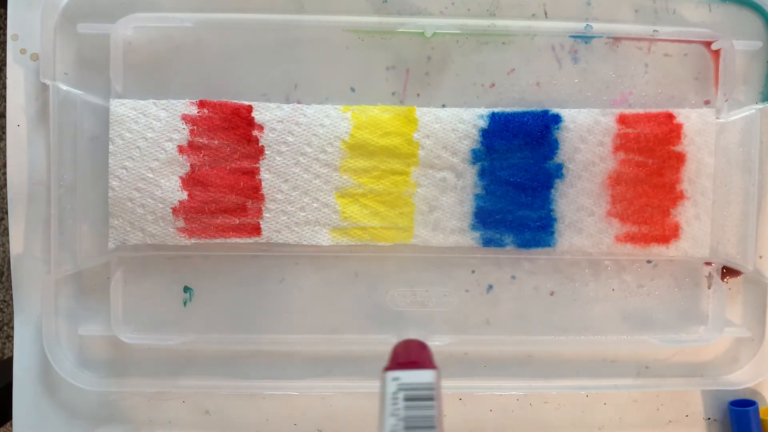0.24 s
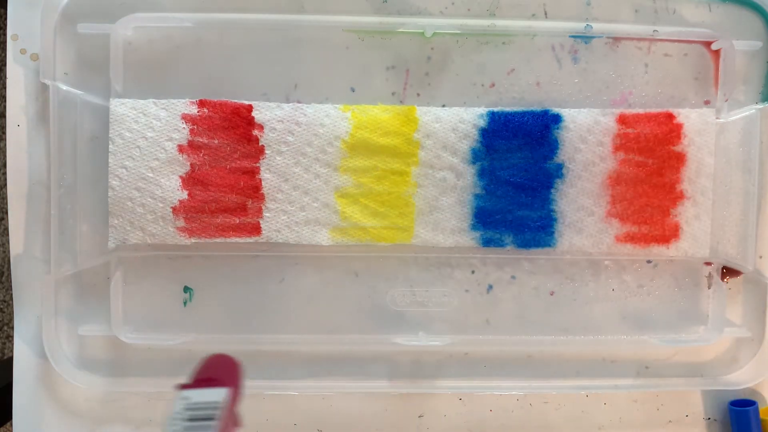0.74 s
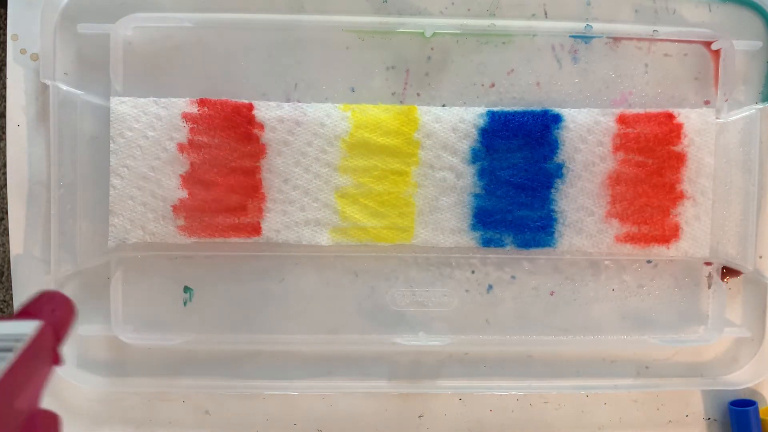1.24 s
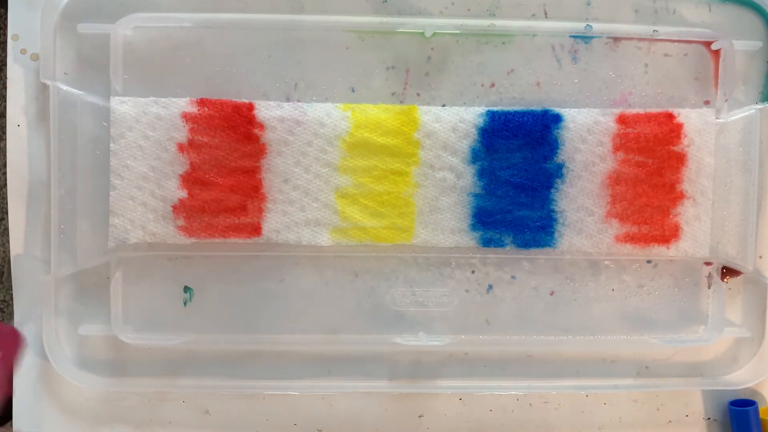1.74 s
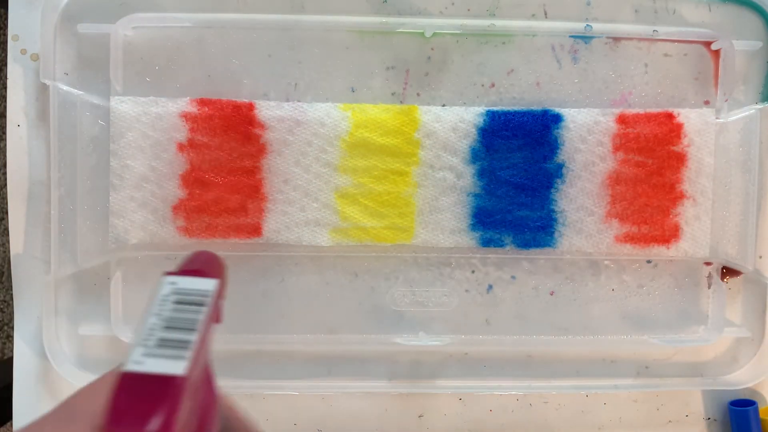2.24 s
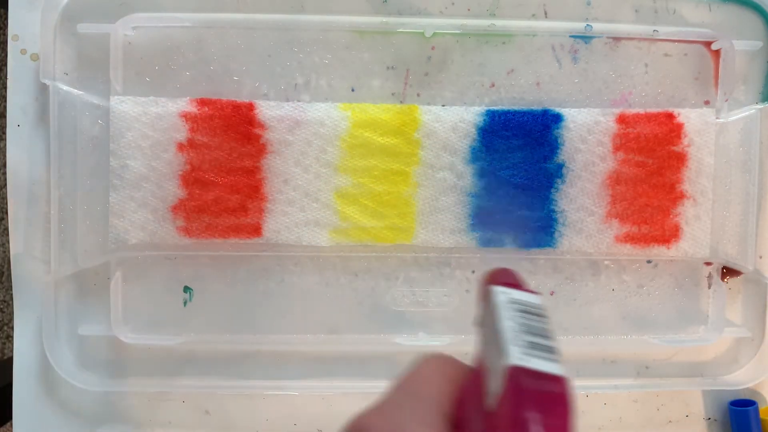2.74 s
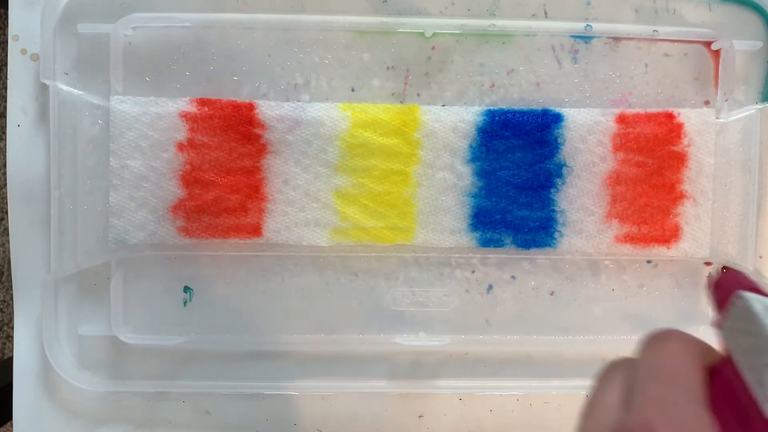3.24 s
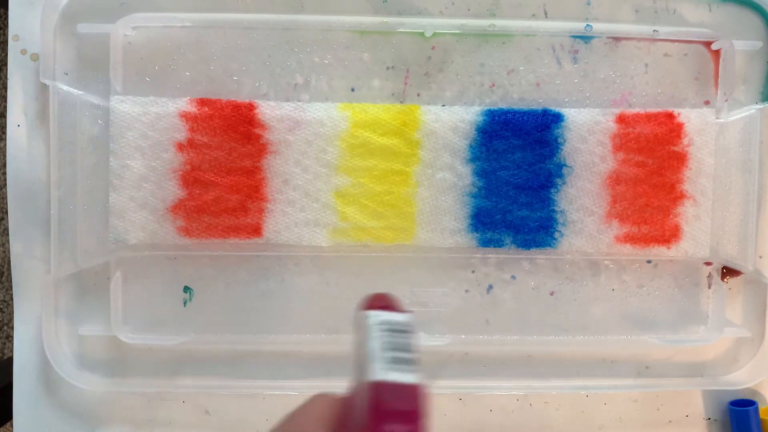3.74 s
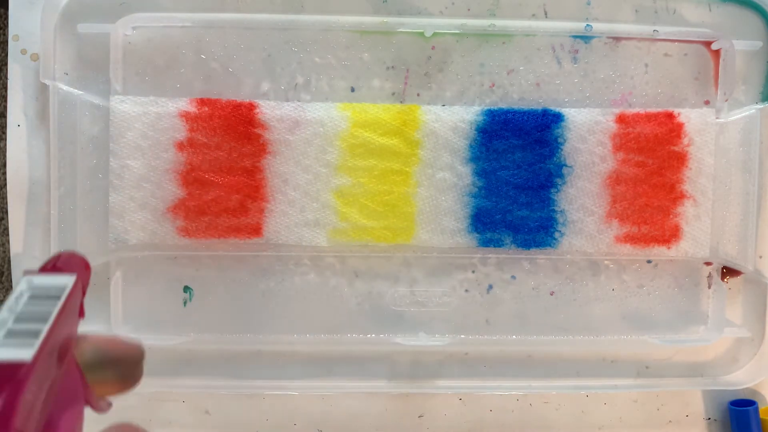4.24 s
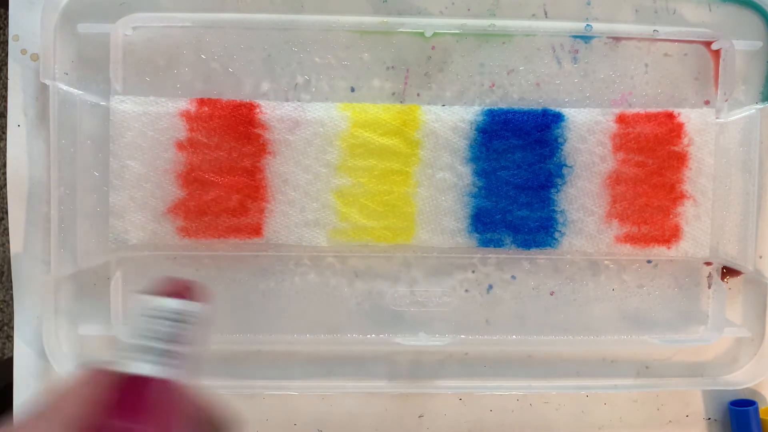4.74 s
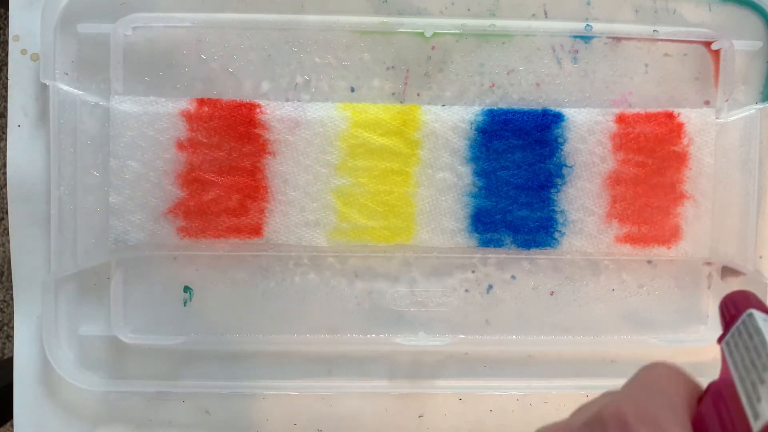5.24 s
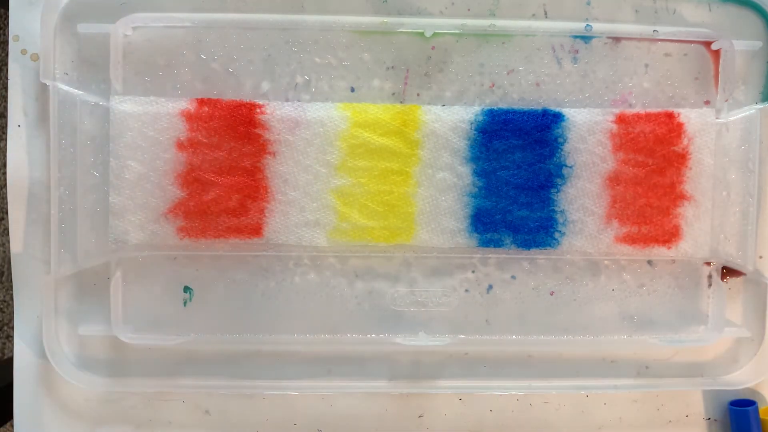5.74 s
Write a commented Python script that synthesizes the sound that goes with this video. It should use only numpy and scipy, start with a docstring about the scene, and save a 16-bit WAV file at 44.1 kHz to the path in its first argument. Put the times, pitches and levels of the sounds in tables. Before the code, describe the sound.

Close up in a quiet room, a hand pumps a plastic spray bottle nine times in a fast, even rhythm. Each stroke ticks, hisses brightly, patters on paper towel in a plastic tray, and clacks back. After a short pause with light finger taps come four less regular squirts, then the bottle is knocked down onto a surface.

```python
"""Over a quiet room's murmur, a hand pumps a plastic trigger sprayer: nine quick strokes, a pause, four looser ones.
In each stroke the trigger ticks (noise snaps, decaying sines), the nozzle hisses (shaped noise), droplets patter
on paper towel and a plastic tray (random clicks in noise), the piston thumps the bottle (sagging low sines) and
the lever springs back with a rattle. Between strokes the hand rustles and taps; last, the bottle is set down
(struck modes). Two microphone ports a few centimetres apart hear it from one end."""
import sys
import numpy as np
from scipy import signal
from scipy.fft import rfft, irfft, next_fast_len
from scipy.io import wavfile

SR = 44100
rng = np.random.default_rng(int(sys.argv[2]) if len(sys.argv) > 2 else 0)


def master_out(mix):
    """Clip the mix to full scale and print it as 16-bit PCM to the path in sys.argv[1]."""
    frames = np.transpose(np.atleast_2d(mix))
    ceiling = np.clip(frames, -1, 1)
    pcm = np.round(ceiling * 32767).astype(np.int16)
    wavfile.write(sys.argv[1], SR, pcm)


N = 263806
FAST = next_fast_len(N)   # FFT length


def amp(db):
    """dB to gain."""
    return 10 ** (np.asarray(db) / 20)


def rms_one(x):
    """Scale to rms 1."""
    return x / np.sqrt(np.mean(x ** 2) + 1e-20)


def at_hz(points, size):
    """Read a table over log frequency on the FFT grid."""
    hz, value = np.transpose(points)
    grid_hz = np.arange(size // 2 + 1) * SR / size
    return np.interp(np.log(grid_hz + 1), np.log(hz), value)


def colour(x, spectrum):
    """Filter a signal by a dB curve over frequency."""
    return irfft(rfft(x, FAST) * amp(at_hz(spectrum, FAST)), FAST)[..., :N]


def coloured_noise(spectrum):
    """Steady noise of the given colour, rms 1."""
    return rms_one(colour(rng.standard_normal(N), spectrum))


def drift(hz):
    """Slow random wander: noise through a two-pole low-pass, rms 1."""
    r = np.exp(-2 * np.pi * hz / SR)
    warm_up = 9000
    noise = rng.standard_normal(N + warm_up)
    return rms_one(signal.lfilter([1], [1, -2 * r, r * r], noise)[warm_up:])


def clicks(times, gains):
    """One sample for each event, over a floor far too low to hear."""
    out = np.full(N, 1e-18)
    np.add.at(out, (np.asarray(times) * SR).astype(int), gains)
    return out


def dying(x, t60):
    """Each click becomes an envelope that falls 60 dB in t60 seconds."""
    return signal.lfilter([1], [1, -amp(-60 / (t60 * SR))], x)


def ring(x, hz, t60):
    """A resonator: a unit click sets off a decaying sine that starts near height 1."""
    r, w = amp(-60 / (t60 * SR)), 2 * np.pi * hz / SR
    return signal.lfilter([0, np.sin(w)], [1, -2 * r * np.cos(w), r * r], x)


def struck(times, level_db, modes):
    """Every blow strikes each mode with a random strength of its own."""
    chance_db = rng.normal(0, 2.5, (len(times), len(modes)))
    out = 0
    for k, (hz, db, t60) in enumerate(modes):
        blows = clicks(times, amp(level_db + db + chance_db[:, k]))
        out = out + ring(blows, hz, t60)
    return out


def gain_curve(tables, axis):
    """Join dB corners into gain over time; each table fades in over 4 ms and out over 20 ms."""
    t, out = np.arange(N) / SR, np.zeros(N)
    for rows in tables:
        rows = np.array(rows)
        fade_in = np.clip((t - rows[0, 0]) / .004 + 1, 0, 1)
        fade_out = np.clip((rows[-1, 0] - t) / .02 + 1, 0, 1)
        level = amp(np.interp(t, rows[:, 0], rows[:, axis]))
        out = np.maximum(out, fade_in * fade_out * level)
    return out


def grains(per_s, spread_db):
    """Random clicks of uneven size and either sign, rms 1."""
    sizes = amp(spread_db * np.minimum(rng.exponential(1, N), 4)) * rng.choice([-1, 1], N)
    return rms_one(sizes * (rng.random(N) < per_s / SR))


def echoes(t60):
    """A dying noise for each port, unit energy, after a 0.8 ms gap."""
    t = np.arange(int(.4 * SR)) / SR
    tail = rng.standard_normal((2, len(t))) * amp(-60 * t / t60) * (t > .0008)
    return tail / np.sqrt(np.sum(tail ** 2, axis=1, keepdims=True))


# phase lead of the left port over the right: pitch_hz, lead_rad
PORT_LEAD = [(100, 0), (1000, .5), (1800, .3), (3400, 1.5), (4700, 2.9), (5500, 3.4), (6600, 4.8),
             (7900, 6.1), (9300, 6.4), (10500, 7.9), (11600, 9.2), (13500, 9.6), (14100, 11), (14900, 12.4),
             (16000, 12.6)]
# level of the left port over the right: pitch_hz, level_db
PORT_SHADE = [(80, -1), (250, -5), (550, -9.5), (1100, 1), (2400, -1.5), (4000, -6), (6000, 1),
              (16000, -0.5)]
TRAY_T60_S, TRAY_DB = .015, -14   # short echo; level against the direct sound
ROOM_T60_S, ROOM_DB = .3, -21


def ports(x):
    """Left and right differ in phase and level by frequency; tray and room echoes are separate at each port."""
    size = next_fast_len(N + SR // 2)
    half = amp(at_hz(PORT_SHADE, size) / 2) * np.exp(.5j * at_hz(PORT_LEAD, size))
    direct = np.array([half, 1 / half])   # the difference is split evenly between the ports
    tails = rfft(amp(TRAY_DB) * echoes(TRAY_T60_S) + amp(ROOM_DB) * echoes(ROOM_T60_S), size)
    return irfft(rfft(x, size) * (direct + tails * abs(direct)), size)[:, :N]


# share of a wide source that differs between the ports: pitch_hz, level_db
PORT_SCATTER = [(100, -14), (500, 1), (1500, -8), (3000, 0), (4400, -3), (5100, -22), (6300, -4),
                (8600, -20), (10300, -4), (12500, -22), (14200, -3), (15300, -20)]


def wide(grainy, spectrum, gain):
    """A spread-out noise: one part from the source direction, one part with noise of its own at each port."""
    common = rms_one(colour(rng.standard_normal(N) + grainy, spectrum))
    separate = rms_one(colour(rng.standard_normal((2, N)) + grainy, spectrum))
    left, right = colour(separate, PORT_SCATTER)
    return ports(common * gain) + np.array([colour(left, PORT_SHADE), right]) * gain


# colour of the room's murmur: pitch_hz, level_db (per Hz, relative)
MURMUR_COLOUR = [(20, -22.5), (45, -2), (90, 2.5), (150, -2), (220, 6), (400, -13.5), (650, -14),
                 (900, -30.5), (1500, -22.5), (3000, -33.5), (5000, -32), (8000, -31.5), (12000, -35),
                 (15500, -55.5)]
MURMUR_DB = -66.5   # before it wavers


def room_tone():
    """Low murmur of air and distant appliances: coloured noise wavering unevenly."""
    return wide(0, MURMUR_COLOUR, amp(MURMUR_DB + 1.5 * drift(3) + 1.5 * drift(12)))


# the hand shifts on the bottle, one list per shift: time_s, level_db (before the clumping)
HAND_SHIFTS = [
    [(2.93, -71.5), (3.04, -78.5), (3.272, -94.5), (3.4, -96.5)],
    [(4.24, -91), (4.284, -102), (4.45, -96)],
    [(4.78, -74), (4.868, -81), (5.05, -85)],
    [(5.4, -74), (5.542, -75), (5.62, -66.5)],
    [(5.64, -63), (5.708, -64), (5.828, -71), (5.98, -80)],
]
# colour of skin on plastic: pitch_hz, level_db (per Hz, relative)
SKIN_COLOUR = [(300, -3), (600, -6.5), (1300, -3.5), (2500, -13), (3800, -7), (6000, -14.5), (12000, -26.5)]


def rustle():
    """Skin and plastic slide softly: grainy noise, its level wandering into clumps."""
    slips = .5 * grains(1500, 4)
    return wide(slips, SKIN_COLOUR, gain_curve(HAND_SHIFTS, axis=1) * amp(2 * drift(12)))


# fingers tap the bottle wall: start_s, level_db (nominal), t60_s
FINGER_TAPS = [(2.975, -57, 0.04), (3.048, -53.5, 0.041), (3.0889, -65, 0.043), (3.1373, -64, 0.039),
               (3.2301, -67.5, 0.045), (4.916, -62, 0.044), (5.442, -63, 0.04), (5.5079, -49, 0.085),
               (5.8206, -55.5, 0.055)]


def taps():
    """Fingers on the bottle wall: dull little bursts of skin-coloured noise."""
    envelope = sum(dying(clicks([s], amp(db - 4.5)), t60) for s, db, t60 in FINGER_TAPS)
    return envelope * coloured_noise(SKIN_COLOUR)


# bottle set down: start_s, level_db (nominal), tilt_db_per_octave (about 1.2 kHz), crack_db (nominal)
SET_DOWN_KNOCKS = [(5.625, -39, 10.5, -44), (5.644, -48, 7, -80), (5.7, -31.5, -1, -59),
                   (5.72, -46, 0, -69), (5.759, -45, -5.5, -82), (5.766, -48.5, -7, -79)]
# resonances of the bottle set down: pitch_hz, level_db (before tilt and chance), t60_s
BOTTLE_MODES = [(467, -9, 0.098), (572, -9, 0.15), (820, -1, 0.052), (1110, -4.5, 0.072), (1540, 5.5, 0.03),
                (2010, 1, 0.037), (2900, -16, 0.029), (3900, -4.5, .014)]


def knocks():
    """The bottle lands on its rim with a crack, then flat on its base, duller, and rocks: noise and struck modes."""
    start_s, _, _, crack_db = np.transpose(SET_DOWN_KNOCKS)
    hits = clicks(start_s, amp(crack_db + 12.0))
    envelope = dying(hits, 0.018) + amp(-18.5) * dying(hits, 0.17)
    crack = envelope * coloured_noise(PATTER_COLOUR)
    body = 0
    for s, db, tilt_db, _ in SET_DOWN_KNOCKS:
        tilted = [(hz, g + tilt_db * np.log2(hz / 1200), t60) for hz, g, t60 in BOTTLE_MODES]
        body = body + struck([s], db - 7.5, tilted)
    body = signal.lfilter(np.hanning(9) / 4, 1, body)   # the contact lasts a fifth of a millisecond
    return crack + body * (1 + .3 * drift(200))   # the ring is uneven, its level wavering at random


# strokes of the trigger, levels before sputter: squeeze_s, rise_s (to full jet), hold_s, hiss_db (peak),
# sag_db (of the hiss while the jet holds), patter_db (crest), drum_db (tray drumming over the patter)
TRIGGER_STROKES = [(0.039, 0.029, 0.15, -29, 6.5, -37, -12), (0.364, 0.032, 0.14, -30, 3, -36.5, -9),
                   (0.688, 0.04, 0.14, -30.5, 6, -38, -9.5), (1.018, 0.037, 0.13, -30.5, 2, -38, -8),
                   (1.357, 0.036, 0.13, -28, 10, -38.5, -9.5), (1.673, 0.035, 0.12, -29, 3.5, -40, -10.5),
                   (1.992, 0.027, 0.13, -28.5, 3, -37, -8.5), (2.317, 0.037, 0.13, -27, 5.5, -37.5, -10),
                   (2.631, 0.028, 0.14, -27.5, 4.5, -38.5, -13), (3.593, 0.027, 0.12, -26, 10, -37.5, -15),
                   (3.914, 0.028, 0.13, -28, 4.5, -38, -6), (4.492, 0.027, 0.1, -30, 7, -40.5, -21.5),
                   (5.093, 0.022, 0.11, -30, 5, -40, -15.5)]
# the lever springs back after each stroke: let_go_s, valve_delay_s, stop_delay_s (both after let-go);
# nominal levels: let_go_snap_db, let_go_ring_db, valve_snap_db, valve_ring_db, stop_ring_db
LEVER_RETURNS = [(0.237, 0.014, 0.042, -47, -37, -37, -38, -34.5),
                 (0.558, 0.014, 0.037, -37.5, -41, -35, -36, -35.5),
                 (0.892, 0.016, 0.036, -40, -38, -39, -42, -33.5),
                 (1.215, 0.015, 0.04, -47.5, -41, -32.5, -42, -36.5),
                 (1.552, 0.012, 0.037, -39.5, -42.5, -37.5, -48, -30),
                 (1.85, 0.023, 0.048, -37.5, -46, -34, -41, -38),
                 (2.179, 0.016, 0.042, -42, -40, -37.5, -39, -38.5),
                 (2.511, 0.015, 0.043, -35.5, -42.5, -34, -35, -37.5),
                 (2.833, 0.017, 0.042, -42.5, -40, -35.5, -38.5, -38),
                 (3.762, 0.018, 0.046, -60, -54, -34.5, -39, -36),
                 (4.103, 0.016, 0.044, -54.5, -40.5, -33.5, -46, -30.5),
                 (4.652, 0.016, 0.042, -60, -61, -35.5, -37, -41),
                 (5.252, 0.025, 0.048, -53, -49, -34.5, -37, -41)]
LEAD_IN_S, DIE_S = 0.013, 0.049   # a stroke wakes before the squeeze and dies after the lever stops
HISS_WAKE_DB, HISS_SQUEEZE_DB, HISS_STOP_DB, HISS_END_DB = -71.5, -52.5, -71, -82   # faint, around the jet
HISS_HALF_SAG = .3   # share of the sag lost halfway
DRIBBLE_S, DRIBBLE_DB = 0.023, 11   # the jet dribbles this long and loses this much
PATTER_WAKE_DB, PATTER_SQUEEZE_DB = -60, -49.5
PATTER_SHUT_DB, PATTER_STOP_DB, PATTER_END_DB = -57, -55.5, -69.5
PATTER_RISE_DB, PATTER_CREST_S = 1.5, 0.058   # climb from full jet to a crest this long before the shut


def stroke_curves():
    """Gains of hiss, patter and drumming: corners at wake, squeeze, full jet, sag or crest, shut, stop and end."""
    hiss, drops = [], []
    for stroke, (let_go, _, travel, *_) in zip(TRIGGER_STROKES, LEVER_RETURNS):
        squeeze, rise, hold, hiss_db, sag_db, patter_db, drum_db = stroke
        wake, full = squeeze - LEAD_IN_S, squeeze + rise
        shut, stop = full + hold, let_go + travel
        end = stop + DIE_S
        hiss.append([(wake, HISS_WAKE_DB), (squeeze, HISS_SQUEEZE_DB), (full, hiss_db),
                     (full + hold / 2, hiss_db - HISS_HALF_SAG * sag_db), (shut, hiss_db - sag_db),
                     (shut + DRIBBLE_S, hiss_db - sag_db - DRIBBLE_DB),
                     (stop, HISS_STOP_DB), (end, HISS_END_DB)])
        patter = [(wake, PATTER_WAKE_DB), (squeeze, PATTER_SQUEEZE_DB), (full, patter_db - PATTER_RISE_DB),
                  (shut - PATTER_CREST_S, patter_db), (shut, PATTER_SHUT_DB),
                  (stop, PATTER_STOP_DB), (end, PATTER_END_DB)]
        drops.append([(s, db, db + drum_db) for s, db in patter])
    return gain_curve(hiss, axis=1), gain_curve(drops, axis=1), gain_curve(drops, axis=2)


# the head sings under the moving piston: pitch_hz, level_db (relative to the drag), t60_s
PISTON_MODES = [(1222, -26.5, 0.03), (1350, -34, 0.0061), (2050, -39, 0.007)]


def pump():
    """The piston seal drags in its barrel while water flows: grains at the patter's level ring the head."""
    _, flow, _ = stroke_curves()
    drag = flow * amp(2.5 * drift(60)) * grains(3000, 3)
    return sum(amp(db) * ring(drag, hz, t60) for hz, db, t60 in PISTON_MODES)


# the piston thumps the bottle, mostly during the squeeze: start_s, level_db (nominal)
PISTON_THUMPS = [(0.074, -27.5), (0.368, -40.5), (0.396, -28.5), (0.701, -38.5), (0.726, -31), (1.03, -35),
                 (1.327, -46.5), (1.691, -34.5), (2.005, -39), (2.025, -29.5), (2.335, -32), (2.636, -41),
                 (2.661, -30.5), (3.584, -41), (3.844, -46.5), (3.926, -37), (4.492, -39.5), (4.678, -50),
                 (4.743, -47), (5.095, -38.5)]
# nominal pitches, before chance and the sag: listed thumps, slackening piston, landing piston
THUMP_HZ, LET_GO_THUMP_HZ, STOP_THUMP_HZ = 280.2, 244, 272.3
LET_GO_THUMP_DB, STOP_THUMP_DB = -4.5, -40   # first is over the let-go ring
THUMP_LAG_S = 0.0035   # the bottle answers the lever's stop this late
THUMP_SPREAD = 0.05   # share by which the pitch varies


def thump_rows():
    """Listed thumps, then those of the slackening and the landing piston: start_s, level_db, pitch_hz."""
    rows = [(s, db, THUMP_HZ) for s, db in PISTON_THUMPS]
    for let_go, _, _, _, ring_db, *_ in LEVER_RETURNS:
        rows.append((let_go, ring_db + LET_GO_THUMP_DB, LET_GO_THUMP_HZ))
    for let_go, _, travel, *_ in LEVER_RETURNS:
        rows.append((let_go + travel + THUMP_LAG_S, STOP_THUMP_DB, STOP_THUMP_HZ))
    return rows


def thumps():
    """The piston pushes the bottle wall: two or three low cycles that swell and die, sagging in pitch."""
    out, t = np.zeros(N), np.arange(3000) / SR
    shape = (t / 0.0053) ** 2 * np.exp(2 - 2 * t / 0.0043)
    sagging_time = 0.83 * t + 0.0025 * (1 - np.exp(-t / 0.0059))
    for s, db, hz in thump_rows():
        turns = hz * (1 + THUMP_SPREAD * rng.standard_normal()) * sagging_time
        wave = np.sin(2 * np.pi * turns + rng.uniform(0, 2 * np.pi))
        i = int(s * SR)
        out[i:i + 3000] += amp(db + 2.66) * shape * wave
    return out


# ticks as the finger takes up, squeezes and seats the lever: start_s, snap_db, ring_db (both nominal)
LEVER_TICKS = [(0.004, -33.5, -36.5), (0.038, -25.5, -39), (0.053, -31, -31.5), (0.064, -31, -30.5),
               (0.07, -37, -31), (0.329, -39.5, -38), (0.364, -24.5, -39), (0.378, -32, -31.5),
               (0.392, -34.5, -29.5), (0.652, -39, -35.5), (0.689, -25, -38), (0.879, -48, -43),
               (0.705, -24, -34.5), (0.72, -31, -25.5), (1.013, -41, -38.5), (1.308, -46, -54),
               (1.327, -45.5, -41), (1.647, -41.5, -34), (1.67, -30.5, -37), (1.68, -34, -36),
               (1.945, -33, -33.5), (1.955, -42, -36.5), (1.991, -27, -34.5), (2.005, -26.5, -30),
               (2.205, -53.5, -38), (2.315, -32.5, -41.5), (2.325, -31.5, -29), (2.605, -31, -41),
               (2.631, -29, -36.5), (2.643, -27, -36), (3.02, -66, -56), (3.296, -59.5, -69.5),
               (3.567, -36, -32), (3.588, -63, -36.5), (3.82, -46, -41.5), (3.848, -29.5, -32),
               (3.86, -44.5, -41), (3.892, -41.5, -38.5), (3.909, -32, -35), (3.923, -37.5, -28),
               (4.192, -31, -31), (4.2, -43.5, -43.5), (4.309, -58, -59), (4.473, -37.5, -32.5),
               (4.487, -39, -36), (4.715, -60, -58), (4.744, -40, -39.5), (5.068, -39.5, -34),
               (5.089, -58, -32), (5.309, -64, -42), (5.334, -49, -41.5), (5.355, -36, -35),
               (5.556, -66, -50)]
# nominal ring of the head, before the grip shifts it by a random share
TICK_HZ, LET_GO_HZ, VALVE_HZ, STOP_HZ, GRIP_SPREAD = 1323.5, 1200, 1282, 1357, 0.028
STOP_SNAP_DB = -51.5
CHATTER_SNAP_DB, CHATTER_RING_DB, CHATTER_SPREAD_DB = -60, -50.5, 2   # two faint loose ticks about each stop


def tick_rows():
    """Listed ticks, then let-go, valve, stop and chatter, as columns: start_s, snap_db, ring_db, pitch_hz."""
    rows = [(s, snap_db, ring_db, TICK_HZ) for s, snap_db, ring_db in LEVER_TICKS]
    for let_go, delay, travel, go_snap_db, go_ring_db, valve_snap_db, valve_ring_db, stop_db in LEVER_RETURNS:
        stop = let_go + travel
        rows += [(let_go, go_snap_db, go_ring_db, LET_GO_HZ),
                 (let_go + delay, valve_snap_db, valve_ring_db, VALVE_HZ),
                 (stop, STOP_SNAP_DB, stop_db, STOP_HZ)]
        for offset_s in (rng.uniform(-.018, -.008), rng.uniform(.01, .035)):
            chance_db = CHATTER_SPREAD_DB * rng.standard_normal()
            rows.append((stop + offset_s, CHATTER_SNAP_DB + chance_db, CHATTER_RING_DB + chance_db, TICK_HZ))
    s, snap_db, ring_db, ring_hz = np.transpose(rows)
    return s, snap_db, ring_db, ring_hz * (1 + GRIP_SPREAD * rng.standard_normal(len(s)))


# trigger head beside its main ring: pitch_hz, level_db (before chance), t60_s
HEAD_SIDE_MODES = [(599, -9, 0.0064), (1244, -13, 0.11), (2080, -22, 0.0057), (2500, -10, 0.0062)]
# colour of the plastic snap: pitch_hz, level_db (per Hz, relative)
SNAP_COLOUR = [(1500, -9), (3000, -6.5), (5000, 5.5), (7500, 11), (10000, 5), (13000, -3.5), (16000, -15)]
CLACK_DB, CLACK_T60_S = -8.5, 0.017   # dull noisy clack under each ring of the head


def ticks():
    """Plastic on plastic: a bright noise snap; the hollow head swells and rings at a pitch set by the grip."""
    s, snap_db, ring_db, ring_hz = tick_rows()
    hits = clicks(s, amp(snap_db + 5))
    tail = amp(-18) * dying(hits, .055)
    snap = (dying(hits, 0.004) + tail) * coloured_noise(SNAP_COLOUR)
    head, t = np.zeros(N), np.arange(1500) / SR
    shape = t / 0.0053 * np.exp(1 - t / 0.0023)
    sag = 1 + 0.052 * np.exp(-t / 0.00066)   # the blow stiffens the wall at first
    for i, db, hz in zip((s * SR).astype(int), ring_db, ring_hz):
        head[i:i + 1500] += amp(db + 4.0) * shape * np.sin(2 * np.pi * hz * np.cumsum(sag) / SR)
    roughness = 1 + .45 * drift(400)   # rough ring: its level wavers fast and at random
    clack = dying(clicks(s, amp(ring_db + CLACK_DB)), CLACK_T60_S) * coloured_noise(SKIN_COLOUR)
    return snap + clack + (head + struck(s, ring_db - 0.5, HEAD_SIDE_MODES)) * roughness


# colour of the nozzle hiss: pitch_hz, level_db (per Hz, relative)
NOZZLE_COLOUR = [(2000, -28), (4000, -10), (5200, -5), (6500, -4), (8600, 0), (10500, -3), (12500, -2.5),
                 (14200, -5.5), (16000, -7)]
# colour of droplets landing: pitch_hz, level_db (per Hz, relative)
PATTER_COLOUR = [(150, -20), (400, -11.5), (800, -2.5), (1250, 0), (1600, 0.5), (2200, -3), (2500, -2.5),
                 (2900, -9.5), (3600, -3), (4200, -5), (5500, -4), (8000, -15.5)]
# colour of the tray floor under the jet: pitch_hz, level_db (per Hz, relative)
TRAY_COLOUR = [(1200, -29), (1800, -5), (2200, 3.5), (2600, -7.5), (3500, -27.5)]


def spray():
    """The water sheet tears at the nozzle, sputtering a little; droplets drum on towel and tray: grainy noises."""
    sputter = drift(120)
    fine, coarse = .6 * grains(6000, 3.5), .7 * grains(2500, 3.5)
    hiss, patter, drum = stroke_curves()
    hiss = hiss * amp(.9 * sputter + .3 * drift(25) - .3)
    patter = patter * amp(sputter + 1.3 * drift(40) - 1.5)   # the same sputter moves both
    drum = drum * amp(2.0 * drift(50))
    return wide(fine, NOZZLE_COLOUR, hiss) + wide(coarse, PATTER_COLOUR, patter) + wide(coarse, TRAY_COLOUR, drum)


BOTTLE_HZ, BOTTLE_T60_S = 219.2, 0.056   # air in the bottle


def scene():
    """Sprayer at the ports, over the room tone; the ports pass no deep bass from the sprayer."""
    pushes = thumps()
    pushes += amp(-41.0) * ring(pushes, BOTTLE_HZ, BOTTLE_T60_S)   # the air space hums after each push
    sprayer = ports(ticks() + pushes + pump() + taps() + knocks()) + spray() + rustle()
    no_bass = signal.butter(3, 130, "high", fs=SR, output="sos")
    return signal.sosfilt(no_bass, sprayer) + room_tone()


def record(dry):
    """A steep low-pass cuts the top above 15.75 kHz."""
    return signal.sosfilt(signal.ellip(12, .5, 75, 15750, fs=SR, output="sos"), dry)


dry = scene()
out = record(dry)
master_out(out)
```